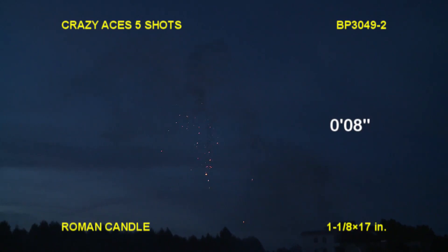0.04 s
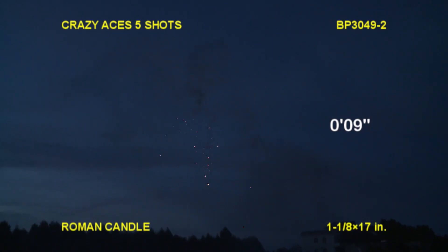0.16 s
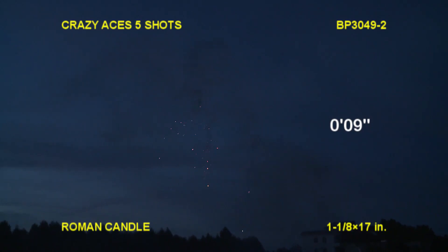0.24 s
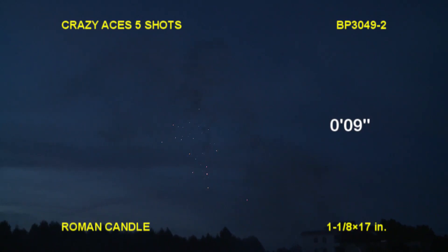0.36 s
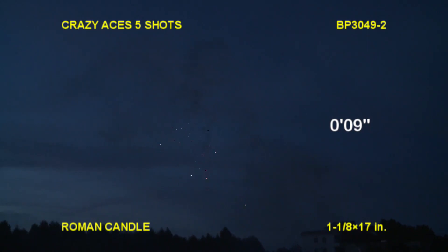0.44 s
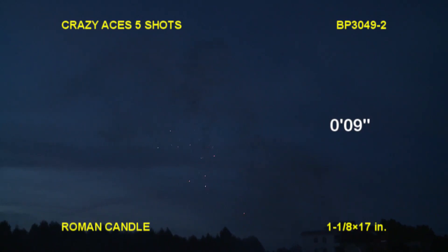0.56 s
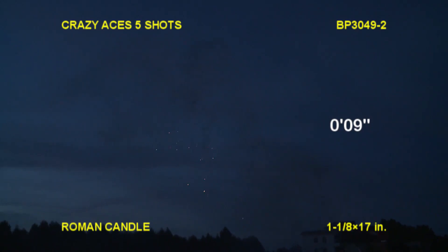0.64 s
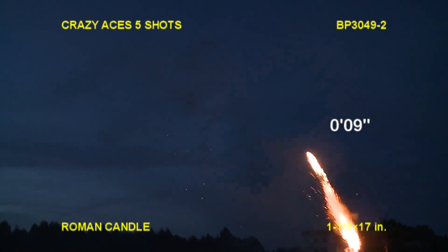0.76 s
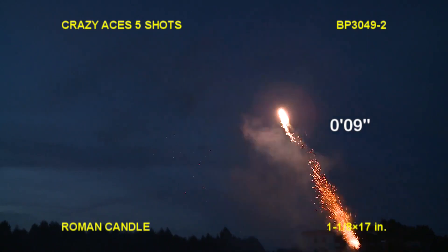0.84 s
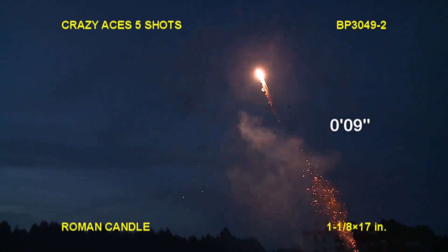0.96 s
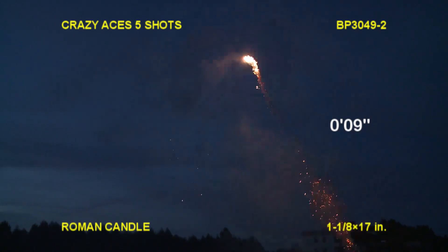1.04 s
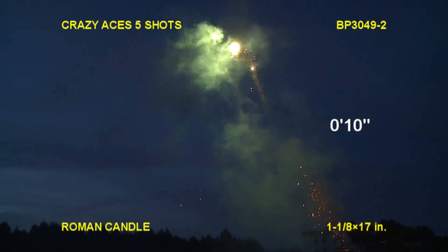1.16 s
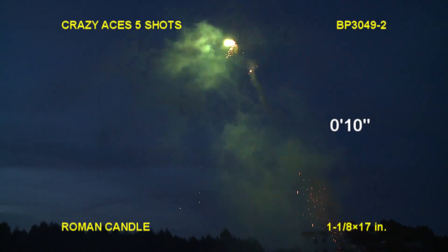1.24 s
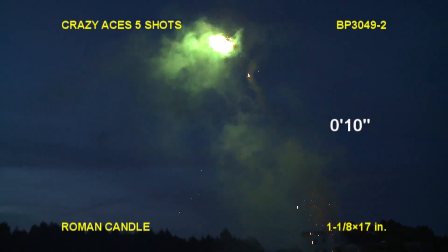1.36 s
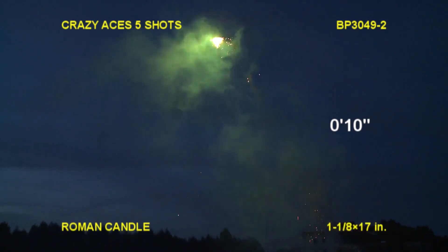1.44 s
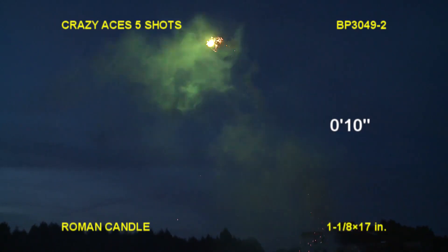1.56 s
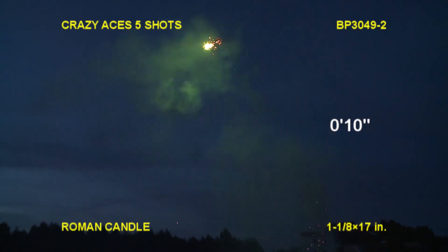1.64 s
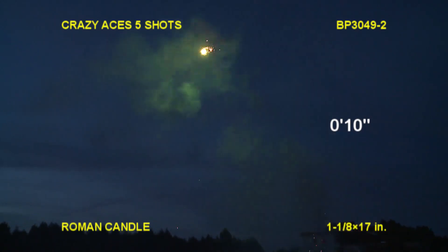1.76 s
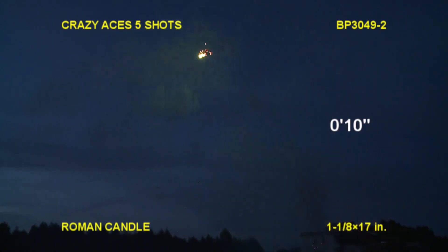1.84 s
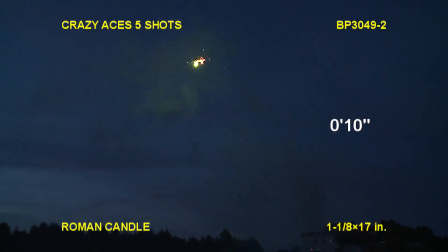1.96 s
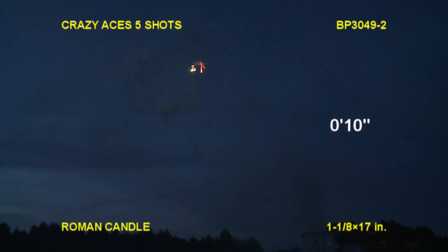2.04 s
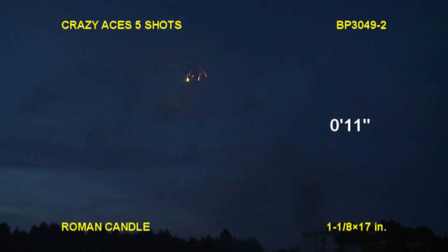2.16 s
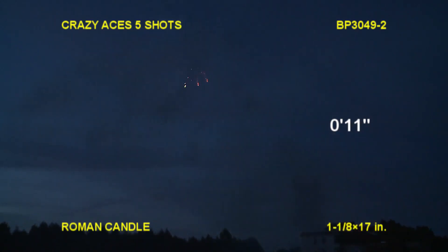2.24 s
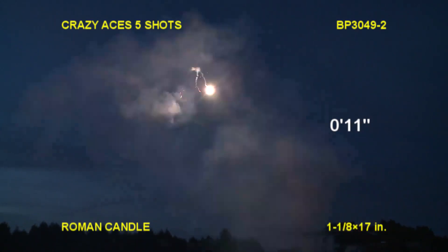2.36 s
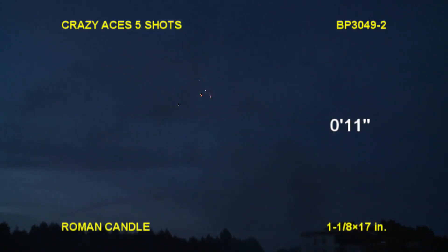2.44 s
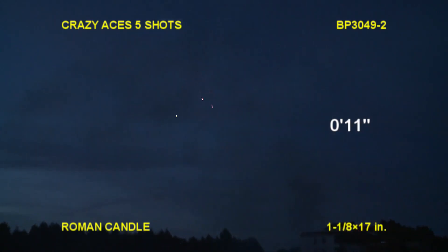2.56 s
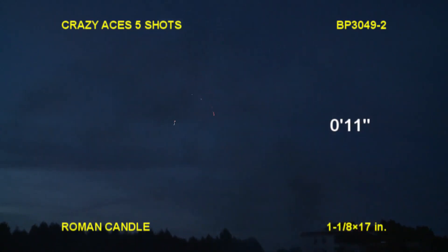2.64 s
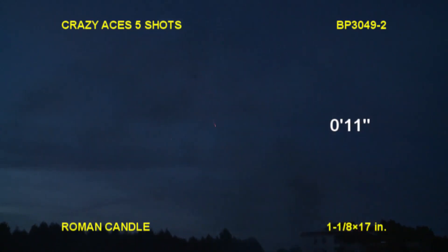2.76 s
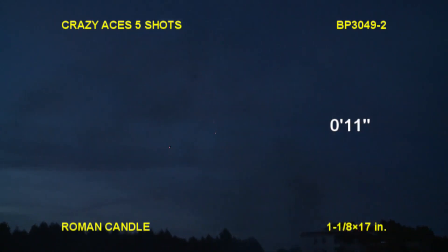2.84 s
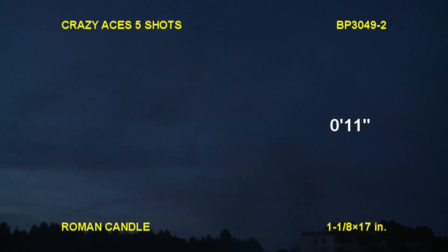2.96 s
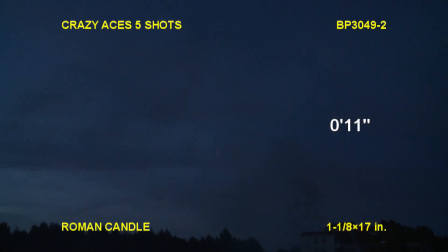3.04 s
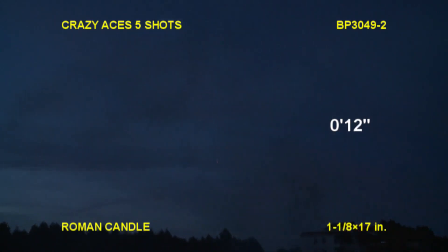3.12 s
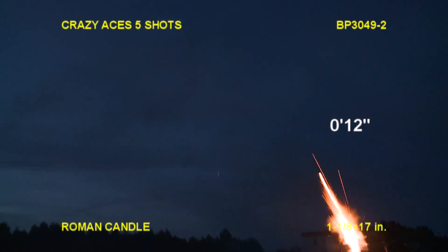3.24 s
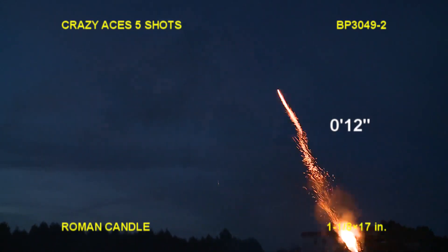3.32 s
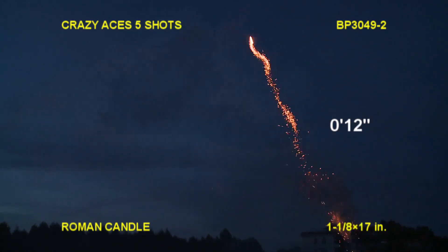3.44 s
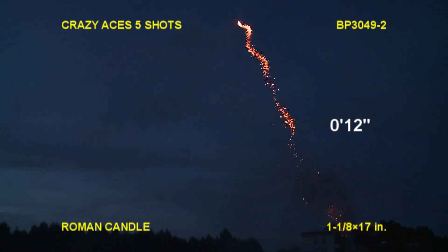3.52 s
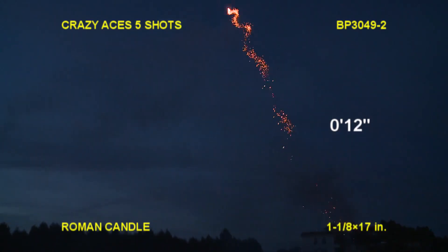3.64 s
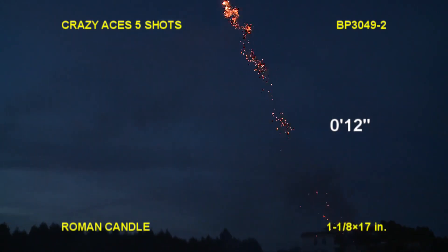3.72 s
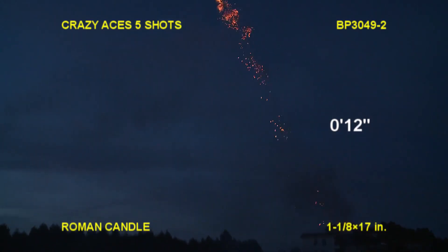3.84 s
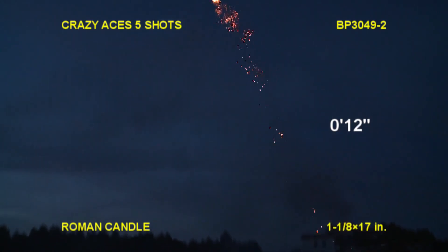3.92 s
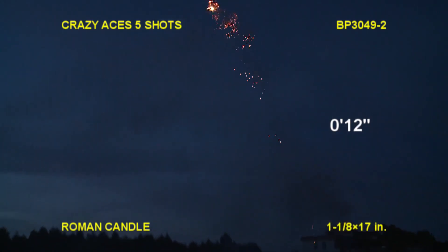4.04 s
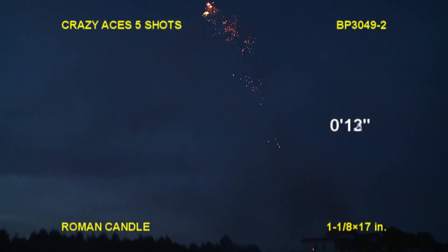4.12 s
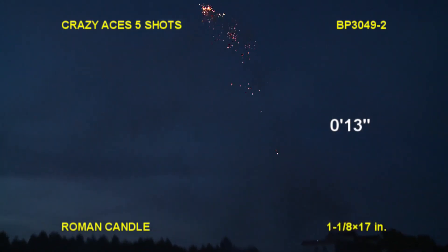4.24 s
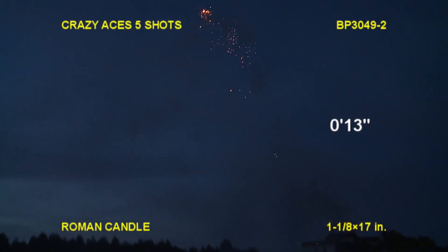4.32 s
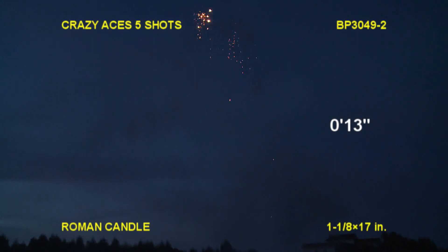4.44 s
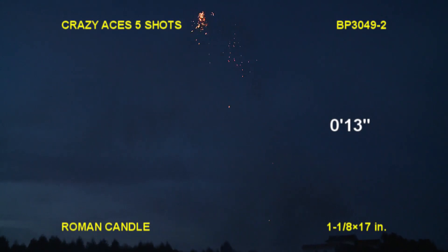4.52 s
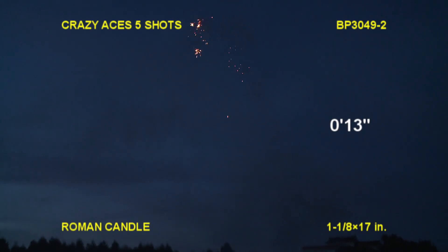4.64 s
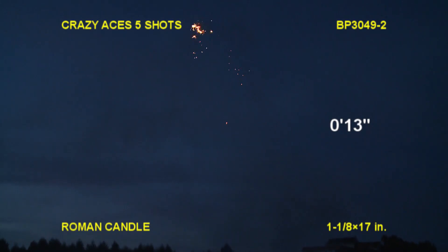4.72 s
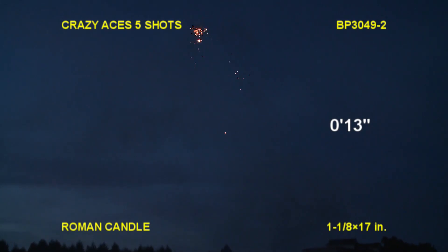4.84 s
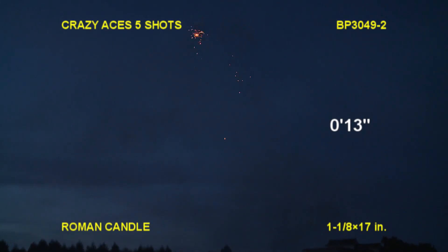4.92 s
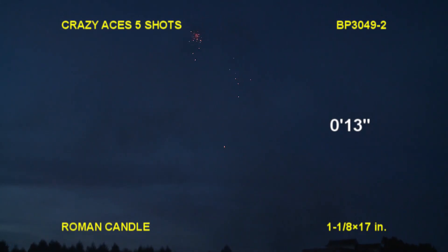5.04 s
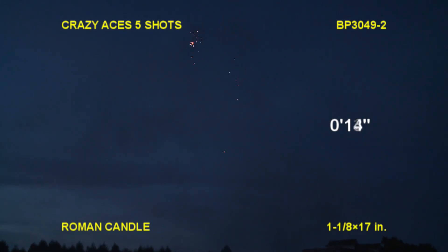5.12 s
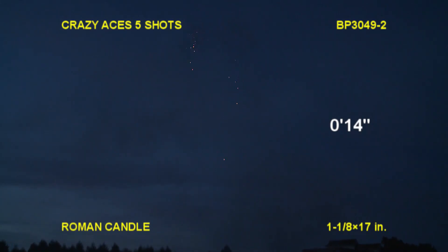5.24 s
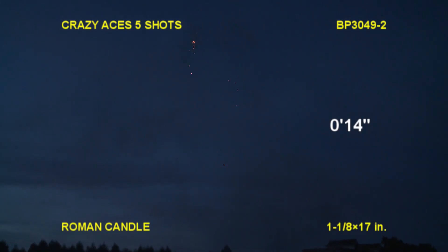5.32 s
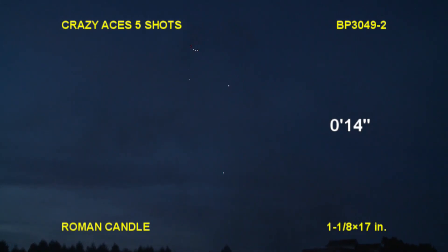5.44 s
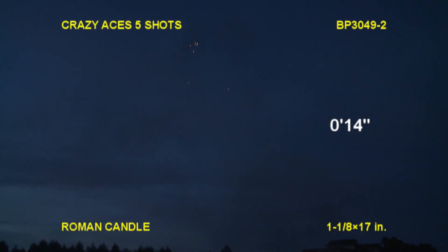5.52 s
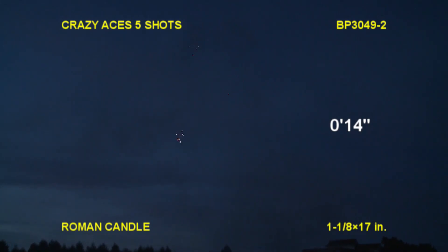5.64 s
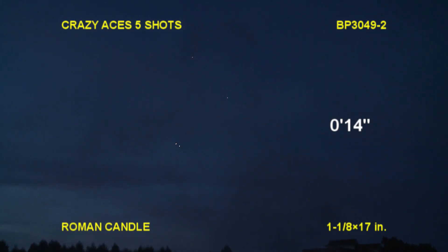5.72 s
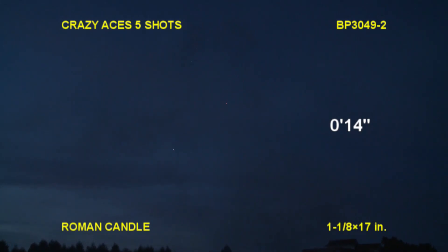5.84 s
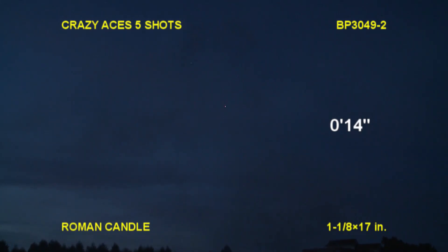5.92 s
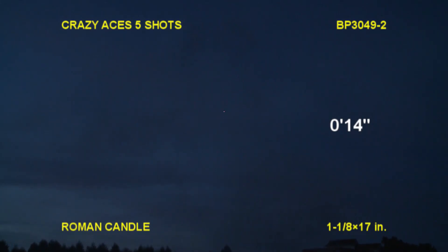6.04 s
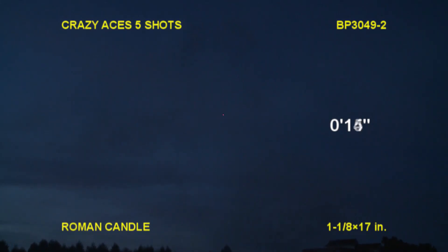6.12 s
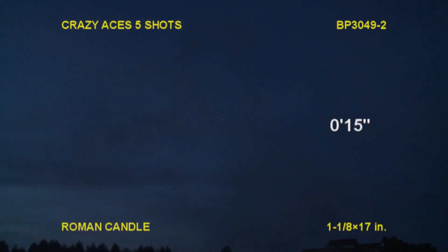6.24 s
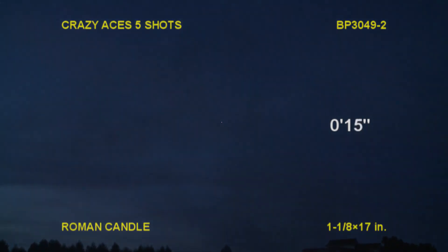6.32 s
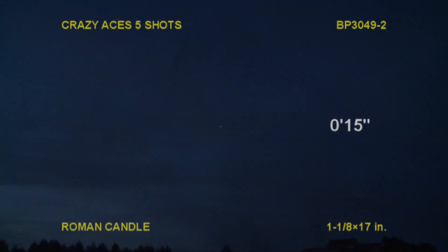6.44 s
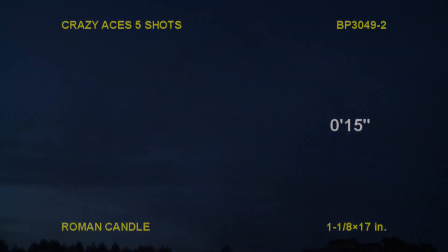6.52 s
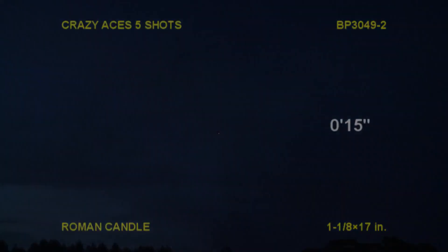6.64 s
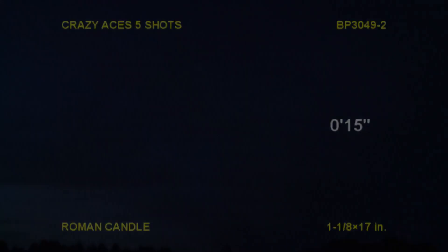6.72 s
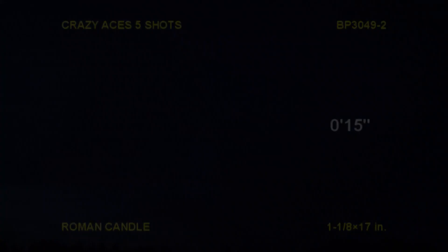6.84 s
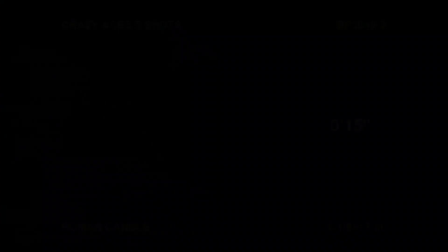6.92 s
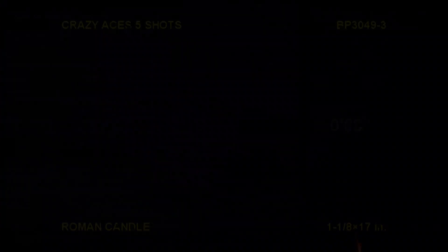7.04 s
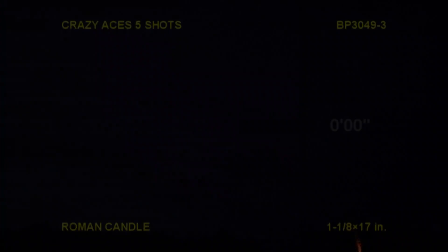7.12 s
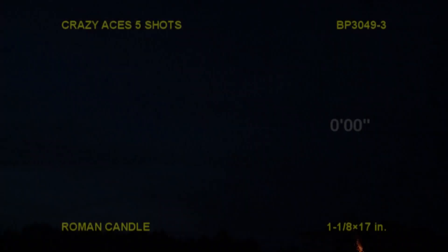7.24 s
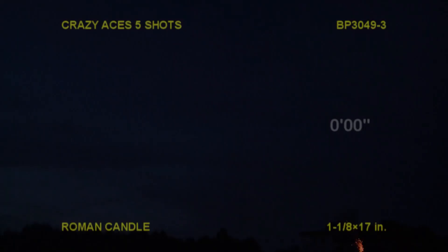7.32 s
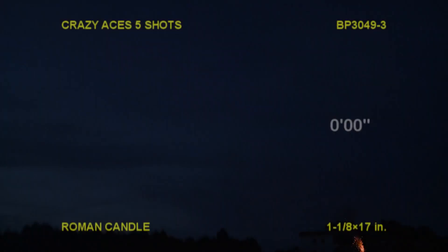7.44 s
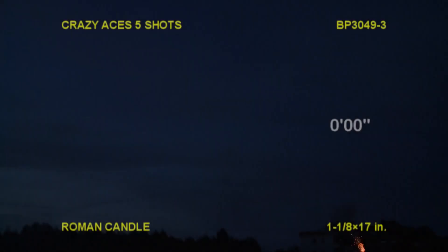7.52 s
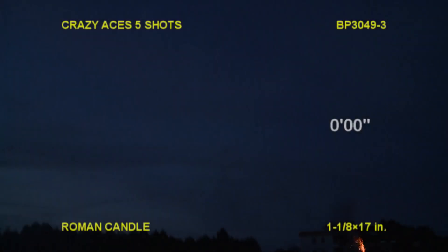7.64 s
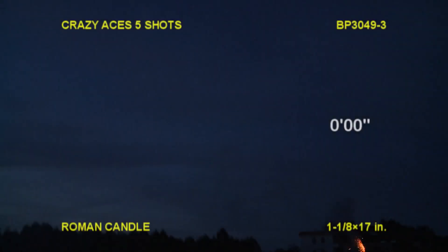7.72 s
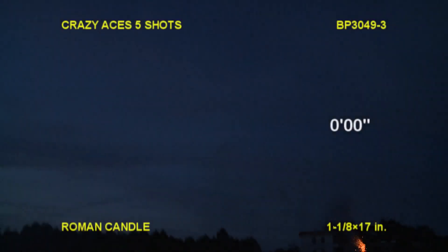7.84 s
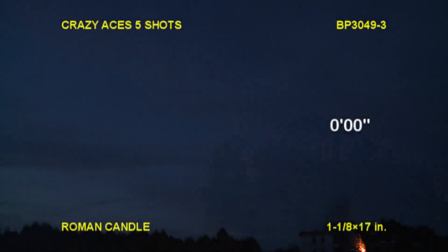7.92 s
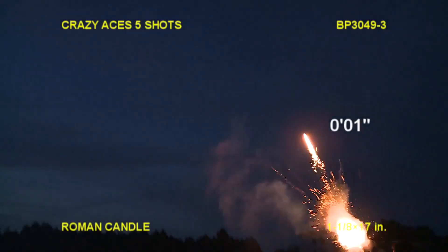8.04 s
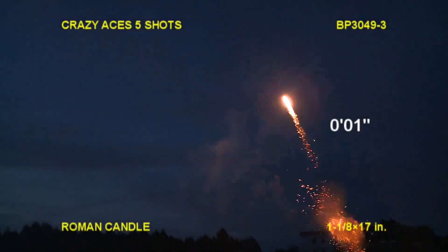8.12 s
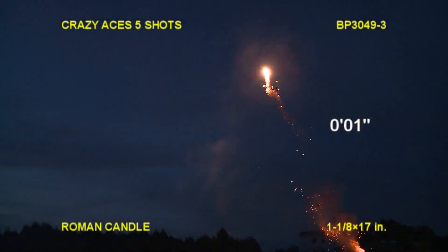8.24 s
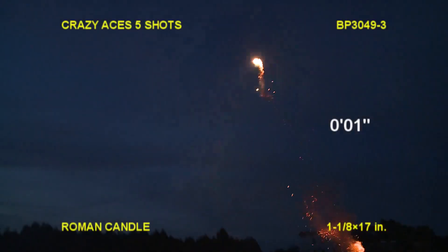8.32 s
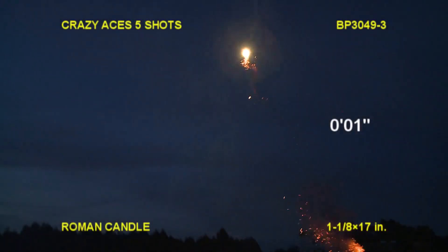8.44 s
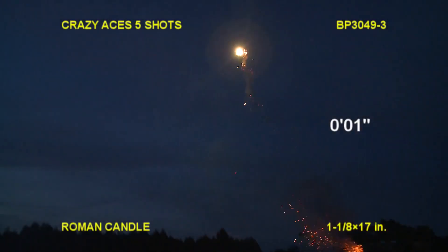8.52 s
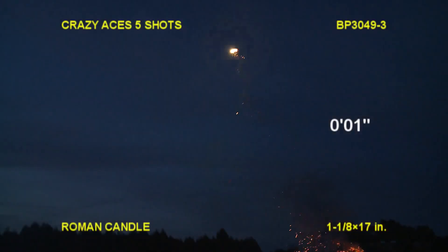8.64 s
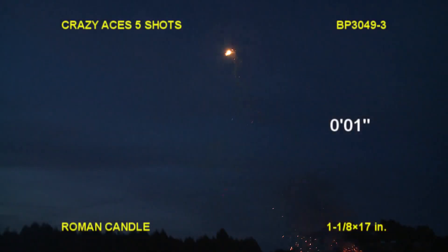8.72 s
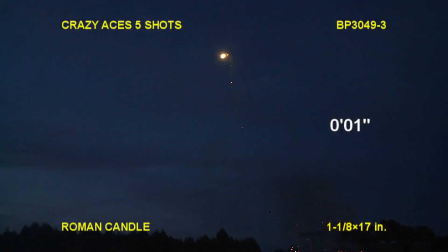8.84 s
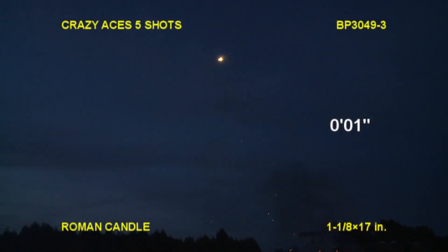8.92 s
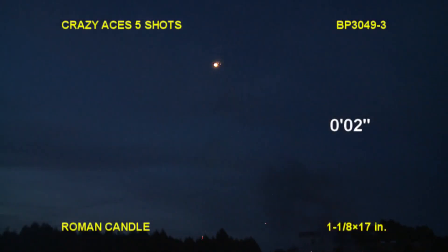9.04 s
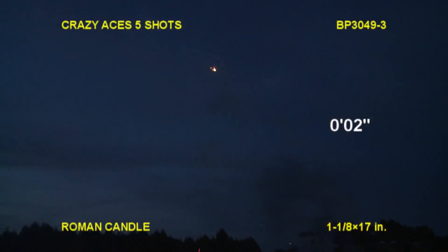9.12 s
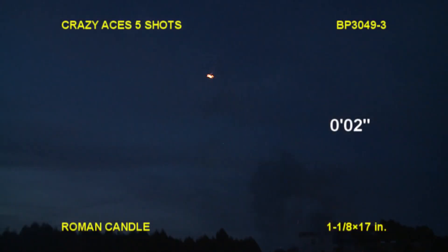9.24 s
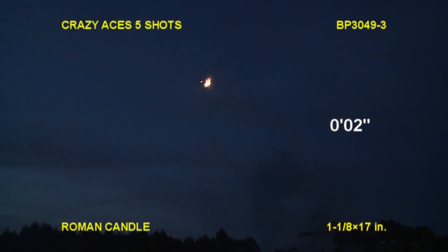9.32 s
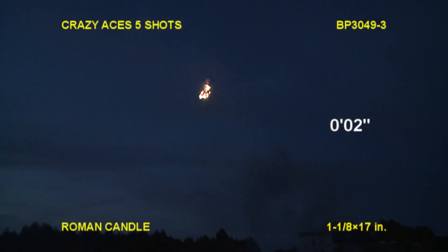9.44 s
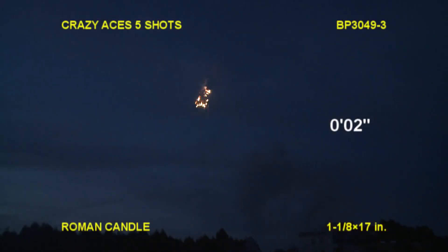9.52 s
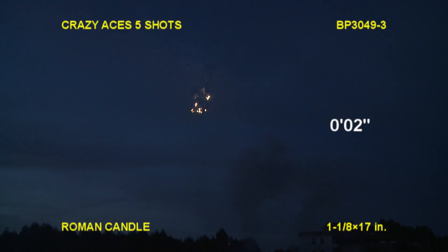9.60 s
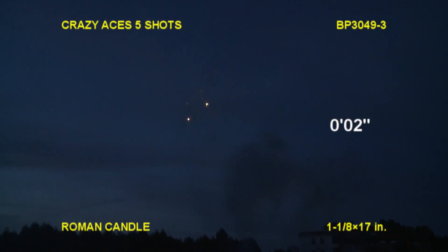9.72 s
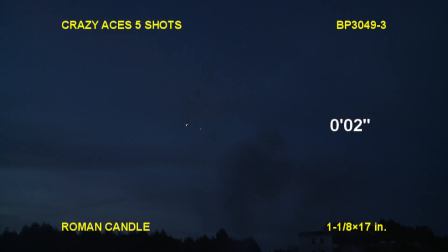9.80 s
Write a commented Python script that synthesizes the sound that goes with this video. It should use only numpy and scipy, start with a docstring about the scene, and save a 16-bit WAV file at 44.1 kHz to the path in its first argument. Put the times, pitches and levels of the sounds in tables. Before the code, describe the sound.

Outdoors at dusk, a firework tube thumps loudly, spitting hissing sparks; a star cracks overhead and echoes off houses and trees. A second thump and crack follow, then a piercing whistle sinks for over a second. Faint pops fade almost to silence before another launch and a tight cluster of bangs. Two nearby microphones overload on the loudest hits.

```python
"""Roman candles at dusk

Two microphones a few metres apart: lift charges thump nearby, stars burst overhead, houses and trees answer.
Bangs are pressure pulses and gas noise sent along many paths, the loudest overloading the inputs.
A whistling star is wavering sines sinking in pitch; sparks, pops and squeaks are short shaped noise bursts.
Air and whistles dip nearly to silence around 7 s; a low humming drone and the tube's hiss sound only after."""
import sys
import numpy as np
from scipy import signal
from scipy.fft import rfft, irfft, next_fast_len
from scipy.io import wavfile
from scipy.ndimage import map_coordinates

SR = 44100
rng = np.random.default_rng(int(sys.argv[2]) if len(sys.argv) > 2 else 0)


def master_out(mix):
    """Clip the mix to full scale and print it as 16-bit PCM to the path in sys.argv[1]."""
    frames = np.transpose(np.atleast_2d(mix))
    ceiling = np.clip(frames, -1, 1)
    pcm = np.round(ceiling * 32767).astype(np.int16)
    wavfile.write(sys.argv[1], SR, pcm)


N = 435266  # length in samples
# every level_db below is relative: mixing gains are added to it


def amp(db):
    """Decibels to gain."""
    return 10 ** (np.asarray(db) / 20)


def unit(x):
    """Scale to rms 1."""
    return x / np.sqrt(np.mean(x ** 2) + 1e-20)


def along(points, hz):
    """Read (Hz, value) points on a log frequency axis."""
    f, v = np.transpose(points)
    return np.interp(np.log(hz + 1), np.log(f + 1), v)


def wobble(rate, count=N):
    """A smooth random curve, rate knots a second."""
    knots = rng.standard_normal(int(count * rate / SR) + 4)
    return map_coordinates(knots, [np.arange(count) * rate / SR])


def filtered(x, response):
    """Multiply the spectrum of x by a complex response of frequency."""
    n = x.shape[-1]
    m = next_fast_len(n + SR // 5)
    return irfft(rfft(x, m) * response(np.fft.rfftfreq(m, 1 / SR)), m)[..., :n]


def coloured(x, points, size=2048):
    """Pass x through a causal minimum-phase filter with the given (Hz, dB) colour."""
    cepstrum = irfft(np.log(amp(along(points, np.fft.rfftfreq(size, 1 / SR)))))
    # folding the cepstrum forward makes the filter causal
    cepstrum[1:size // 2] *= 2
    cepstrum[size // 2 + 1:] = 0
    impulse = irfft(np.exp(rfft(cepstrum)))
    return signal.oaconvolve(x, impulse)[:len(x)]


def noise(points):
    """Steady noise of rms 1 with the given (Hz, dB) colour."""
    size = next_fast_len(N, real=True)
    hz = np.fft.rfftfreq(size, 1 / SR)
    spectrum = amp(along(points, hz)) * np.exp(2j * np.pi * rng.random(len(hz)))
    return unit(irfft(spectrum, size)[:N])


def puff(t60, count=8192):
    """A burst of white noise that falls 60 dB in t60 seconds."""
    return rng.standard_normal(count) * amp(-60 * np.arange(count) / SR / t60)


def panned(lr_db):
    """Left and right gains for a level difference."""
    return amp([[lr_db / 2], [-lr_db / 2]])


def add(track, s, x):
    """Mix x into track from time s on."""
    part = track[max(round(s * SR), 0):][:len(x)]
    part += x[:len(part)]


def swells(rows):
    """Gain of bell-shaped swells (s, dB, half length s), each down to 1/e at its half length."""
    t = np.arange(N) / SR
    return sum(amp(db) * np.exp(-np.minimum(((t - s) / half) ** 2, 20)) for s, db, half in rows)


def ramp(t, s, length):
    """Rise from 0 to 1 over the given length, centred on time s."""
    return np.clip((t - s) / length + .5, 0, 1)


def strewn(span, typical, spread_db, count):
    """Event rows at random times in a span, their levels spread about a typical row."""
    (start, end), (db, *rest) = span, typical
    return [(start + when * (end - start), db + spread_db * (2 * size - 1), *rest)
            for when, size in rng.random((count, 2))]


# how long the open field rings before any stretch: pitch_hz, t60_s
FIELD_DECAY = [(100, 6), (500, 3), (1500, 2.5), (3500, 2), (7000, 2), (14000, 0.53)]
# the colour of its answer: pitch_hz, level_db
FIELD_COLOUR = [(50, -10.5), (300, -18.5), (1200, -4.5), (2300, 0), (4000, -0.5), (6000, 3.5),
                (15000, -0.5)]


def field(build, stretch=1):
    """Stereo echo of trees and houses, left energy 1: it builds up, then the treble dies first."""
    hz, t, z = signal.stft(rng.standard_normal((2, 2 * SR)), SR, nperseg=256)
    t60 = stretch * along(FIELD_DECAY, hz)[:, None]
    decay = amp(along(FIELD_COLOUR, hz)[:, None] - 60 * t / t60)
    tail = signal.istft(z * decay * (1 - np.exp(-t / build)), SR, nperseg=256)[1]
    return tail / np.linalg.norm(tail[0])


# evening air at the left and right microphones: pitch_hz, level_db
AIR_LEFT = [(15, -2.5), (50, -0.5), (110, -8.5), (200, -3), (300, -4.5), (500, -7.5), (1000, -17),
            (2000, -26.5), (4000, -28.5), (8000, -34), (15000, -38.5)]
AIR_RIGHT = [(15, 4), (50, 2.5), (85, -3.5), (130, -14), (220, -19), (350, -23), (1000, -27.5),
             (3500, -38.5), (6000, -43.5), (15000, -55)]
# a faint far hum: its colour (pitch_hz, level_db) and its swell (centre_s, level_db, half_length_s)
FAR_HUM, FAR_HUM_SWELL = [(150, -60.5), (188, -12), (201, 3), (215, -11), (260, -65)], [(5.7, -68, .9)]
# low drone, mostly at the right microphone: pitch_hz, level_db
DRONE_LINES = [(53.5, -0.5), (104, -23)]
# its swells: centre_s, level_db, half_length_s
DRONE_SWELLS = [(7.74, -34.5, 0.6), (8.83, -33.5, 0.3), (9.86, -35.5, 0.21)]
# steady hum above the drone: pitch_hz, level_db
HUM = [(102.3, -56.5), (242.2, -67), (425.3, -63.5), (538.3, -60), (829.0, -65.5)]
# hiss of the burning tube: pitch_hz, level_db
FUSE = [(100, 0), (200, -2.5), (350, -10), (540, -10), (800, -12.5), (1600, -14.5), (2600, -19.5),
        (3800, -24.5), (5500, -36), (8000, -55.5), (15000, -63.5)]
FUSE_GROWS_DB_PER_S = 0.28  # it grows as the tube burns down
SILENT_S, FADE_OUT_S, FADE_IN_S = 7.05, 0.47, 0.41  # centre and sides of the dip in the steady sounds


def background(left_db, right_db, drone_db, fuse_db, hum_db):
    """Noise for evening air; after the dip also a drone of wandering sines and the tube's hiss."""
    since = np.arange(N) / SR - SILENT_S
    right_level = right_db + 0.72 * wobble(7.9)
    air = np.array([amp(left_db) * noise(AIR_LEFT), amp(right_level) * noise(AIR_RIGHT)])
    air += swells(FAR_HUM_SWELL) * noise(FAR_HUM) * panned(-6.5)
    # all lines drift in pitch together
    clock = np.cumsum(1 + 0.0076 * wobble(1.1)) / SR

    def lines(rows):
        return sum(amp(db) * np.sin(2 * np.pi * hz * clock) for hz, db in rows)

    drone = unit(lines(DRONE_LINES)) * amp(drone_db) * swells(DRONE_SWELLS)
    drone = (drone + amp(hum_db) * lines(HUM)) * amp([[-26], [0]])
    fuse_level = fuse_db + FUSE_GROWS_DB_PER_S * since + 2.4 * wobble(4)
    fuse = np.array([noise(FUSE), noise(FUSE)]) * amp(fuse_level) * panned(-10.5)
    return air + (fuse + drone) * (since > 0)


def fade():
    """Gain that falls to a thirtieth or so and comes back."""
    t = np.arange(N) / SR - SILENT_S
    return np.clip(np.maximum(-t / FADE_OUT_S, t / FADE_IN_S), .03, 1)


# an earlier whistle lingering in the field: pitch_hz, level_db
OLD_WHISTLE = [(1650, -44), (2800, -30), (3000, -26.5), (3160, -23.5), (3250, -7), (3350, 7), (3870, 5),
               (4150, 2), (4420, -24), (4800, -20.5), (6240, -54.5), (10600, -120)]


def old_whistle(db, t60, lr_db):
    """The echo of an earlier whistle, narrow noise that dies away."""
    decay = amp(db - 60 * np.arange(N) / SR / t60)
    return np.array([noise(OLD_WHISTLE), noise(OLD_WHISTLE)]) * decay * panned(lr_db)


# flurries of fine crackle from the sparks' trails: centre_s, level_db, half_length_s
FLURRIES = [(.08, -59, 0.11), (.35, -59.5, 0.095), (1.6, -75.5, 0.99), (2.75, -55, 0.15), (4.3, -55, 0.77),
            (7.8, -72.5, .35), (9.42, -57.5, 0.029), (9.8, -40, .15)]
# loudest spark snaps: start_s, level_db, body_db, left_minus_right_db
SPARKS = [(0.436, -35.5, -24, -1), (1.1278, -59.5, 2.5, -19), (1.3794, -44.5, -13, -16),
          (1.797, -38.5, -16.5, -7), (4.7367, -51.5, 0.5, -20), (4.7793, -33, -12, -13),
          (5.2607, -38, -12, -9), (5.7281, -48, -16, -13), (6.9525, -53.5, -11, 17),
          (8.4449, -59, 18, -3.5)]
# colour of a snap: pitch_hz, level_db
SNAP = [(800, -21.5), (2000, -2), (4000, 3), (6000, -7), (10000, -5), (15000, -6)]
# fainter snaps at random while embers fall: from and to in s; typical level_db, body_db, left_minus_right_db
EMBER_SPAN, EMBER = (0, 4.1), (-57, -10, -16)


def sparks(snap_db, body_db, snap_t60, trail_db, grain_t60, grain_spread_db):
    """Single sparks snap, each a sharp and a longer noise burst, over a fine random crackle."""
    out = np.zeros((2, N))
    snaps = SPARKS + strewn(EMBER_SPAN, EMBER, spread_db=3.5, count=12)
    trail = amp(trail_db) * swells(FLURRIES)
    decay = amp(-60 * np.arange(SR // 20) / SR / grain_t60)
    for mic in range(2):
        for s, db, rel_db, lr_db in snaps:
            snap = amp(snap_db) * coloured(puff(snap_t60), SNAP)
            body = coloured(puff(0.084), [(300, -23), (1000, 0.0), (2000, 4.0), (5000, -8.5), (15000, -31)])
            add(out[mic], s, amp(db) * panned(lr_db)[mic] * (snap + amp(body_db + rel_db) * body))
        # every grain is its own tiny burst of noise
        size_db = grain_spread_db * np.minimum(rng.exponential(size=3000), 4)
        power = np.bincount(rng.integers(N, size=3000), amp(size_db) ** 2, N)
        envelope = np.sqrt(np.abs(signal.oaconvolve(power, decay ** 2)[:N]))
        grains = envelope * rng.standard_normal(N)
        crackle = unit(coloured(grains, [(500, -16.5), (2000, 6), (4000, 1.0), (8000, -8), (15000, -7.5)]))
        out[mic] += crackle * trail * panned(-18.5)[mic]
    return out


# loudest dull, distant pops: start_s, level_db, left_minus_right_db
POPS = [(0.383, -44, -2.5), (4.743, -36.5, -14), (5.068, -32, -9), (5.233, -39.5, -3), (5.352, -44, -12),
        (6.118, -34.5, -5.5), (6.245, -38.5, -11.5), (6.438, -35, 3)]
# their colour: pitch_hz, level_db
POP = [(80, -36.5), (200, -8.5), (600, 4), (1050, 5.5), (1700, -31), (4000, -29.5), (12000, -34)]
# a volley of fainter ones: two ends of its span in s; typical level_db, left_minus_right_db
VOLLEY_SPAN, VOLLEY_POP = (5.1, 3.8), (-43, 2)


def pops(level_db, t60, rise):
    """Far reports that have lost their treble and their sharp front."""
    out = np.zeros((2, N))
    for s, db, lr_db in POPS + strewn(VOLLEY_SPAN, VOLLEY_POP, spread_db=7, count=4):
        for mic in range(2):
            report = coloured(puff(t60), POP)
            report *= 1 - np.exp(-np.arange(len(report)) / SR / rise)
            add(out[mic], s, amp(db + level_db) * panned(lr_db)[mic] * report)
    return out


def echoes(walls, scatter_db):
    """Every wall gives one path to each microphone."""
    paths = []
    for left_s, left_db, right_s, right_db in walls:
        paths += [(0, left_s, left_db, scatter_db), (1, right_s, right_db, scatter_db)]
    return paths


# slow pressure push of a bang: pitch_hz, level_db
BOOM = [(30, -3), (90, -5.5), (200, -2), (400, -3.5), (900, -29.5), (4000, -58.5)]
# ring of the right microphone's housing: pitch_hz, width_hz, level_db
HOUSING = (2226, 470, 2.7)


def pressure_front(t, width_ms, swing_db, lowcut_hz, boom_db):
    """A blast pulse crossing zero at its width, a damped swing and a slow push."""
    u = t * 1000 / width_ms
    front = -1.33 * (1 - np.exp(-u / 0.29)) * (1 - u) * np.exp(-u * u / 3.65)
    # the gas overshoots and swings back a few times
    front -= amp(swing_db) * np.sin(2 * np.pi * u / 4.2) * np.exp(-u / 6)
    # the deepest part is lost, and a slow push follows
    front = signal.lfilter(*signal.butter(1, lowcut_hz, "high", fs=SR), front)
    return front + amp(boom_db) * coloured((t == 0) * 1., BOOM)


def near_air(paths, scatter_t60, scatter_hz, near_db, near_t60):
    """Impulse responses of the near paths to both microphones, with a dense noise tail."""
    air = np.zeros((2, SR // 2))
    for mic, delay, path_db, scatter_db in paths:
        # rough walls smear each reflection, the far ones longest; long waves pass unscattered
        smear = puff(scatter_t60 + 0.34 * delay)
        norm = np.linalg.norm(smear)
        smear = signal.lfilter(*signal.butter(1, scatter_hz, "high", fs=SR), smear) * amp(scatter_db) / norm
        smear[0] += 1
        add(air[round(mic)], delay, amp(path_db) * smear)
    # sharp fronts ring the right microphone's housing
    ring_hz, width_hz, ring_db = HOUSING
    air[1] = filtered(air[1], lambda f: 1 + amp(ring_db) * 1j * f * width_hz
                      / (ring_hz ** 2 - f * f + 1j * f * width_hz))
    for mic in range(2):
        near = puff(near_t60)
        add(air[mic], 0, amp(near_db) * near / np.linalg.norm(near))
    return air


def bangs(shots, paths, rush_t60, scatter_t60, near_db, near_t60, field_db, right_field_db,
          lead_db, boom_db, edge_db, lowcut_hz, swing_db, scatter_hz):
    """Each charge sends a pressure pulse and a rush of gas along every path to both microphones."""
    out, t = np.zeros((2, N)), np.arange(SR // 20) / SR
    kick = (t == 0) * 1.
    rush_colour = [(100, 4.0), (500, 12.5), (1500, 14.0), (4000, 1.5), (15000, -25.0)]
    for s, db, width_ms, rush_db, lag_ms in shots:
        front = pressure_front(t, width_ms, swing_db, lowcut_hz, boom_db)
        pulse = front + amp(rush_db) * coloured(puff(rush_t60, count=len(t)), rush_colour)
        # the far field blurs the rush into a smooth roar
        source = front - amp(rush_db + edge_db) * kick
        roar = signal.fftconvolve(source[None], field(build=0.14), axes=1)
        roar *= amp([[field_db], [right_field_db]])
        air = near_air(paths, scatter_t60, scatter_hz, near_db, near_t60)
        for mic in range(2):
            arrival = s + mic * lag_ms / 1000
            add(out[mic], arrival, amp(db) * signal.fftconvolve(pulse, air[mic]))
            add(out[mic], arrival, amp(db) * roar[mic])
            # a few milliseconds of rising hiss just before each bang
            lead = puff(0.0082, count=320)[::-1]
            add(out[mic], arrival - len(lead) / SR, amp(db + rush_db + lead_db) * lead)
    return out


# lift charges, timed at the left microphone: start_s, level_db, width_ms, gas_rush_db
LAUNCHES = [(0.7598, 9.5, 0.76, -26), (3.2939, 13.5, 0.79, -13.5), (8.0032, 14.5, 0.75, -13.5)]
# direct sound and close bounces from the tube: microphone (0 left, 1 right), delay_s, level_db, scatter_db
GROUND_NEAR = [(0, 0.0013, -2.5, -21), (1, 0.00044, -3, -10.5), (1, 0.0017, -4, -8)]
# houses that echo the tube: left_delay_s, left_db, right_delay_s, right_db
GROUND_WALLS = [(.029, -28, .043, -20), (.105, -40, .089, -32.5), (.161, -27, .146, -26.5),
                (.2, -29.5, .185, -26.5), (.248, -38.5, .242, -32)]
TUBE_LAG_MS = 5.35  # the tube is nearer the left microphone, so the right one hears it later


def launches():
    """Lift charges thump from the tube on the ground."""
    return bangs([(*shot, TUBE_LAG_MS) for shot in LAUNCHES],
                 GROUND_NEAR + echoes(GROUND_WALLS, scatter_db=-1.5),
                 rush_t60=0.011, scatter_t60=0.036, near_db=-10.0, near_t60=0.22,
                 field_db=-25.0, right_field_db=-21, lead_db=-14.0, boom_db=3, edge_db=2.5,
                 lowcut_hz=210, swing_db=-15, scatter_hz=400)


# hiss of the sparks thrown from the tube: pitch_hz, level_db
SPRAY = [(500, -7.5), (2000, -3.5), (4000, 4.5), (6500, -10), (10500, -6.5), (15000, -9.5)]


def spray(level_db, t60):
    """Every launch throws a hissing fan of sparks, a second of dying noise."""
    out = np.zeros((2, N))
    for s, db, width_ms, rush_db in LAUNCHES:
        for mic in range(2):
            hiss = coloured(puff(t60, count=SR), SPRAY)
            add(out[mic], s, amp(db + rush_db + level_db) * hiss)
    return out * panned(-12.5)


# short squeaks of a dying star: start_s, level_db
SQUEAKS = [(1.629, -32.5), (1.6652, -37.5), (1.67, -33.5)]
# their colour: pitch_hz, level_db
SQUEAK = [(1000, -25), (2500, -13), (3300, -9.5), (3900, 0), (4600, -10), (5500, -18.5), (9000, -25.5),
          (15000, -11.5)]


def squeaks(level_db, t60):
    """Whistle mixture catches for an instant, a noise burst around one pitch."""
    out = np.zeros((2, N))
    for s, db in SQUEAKS:
        for mic in range(2):
            add(out[mic], s, amp(db + level_db) * coloured(puff(t60), SQUEAK))
    return out * panned(-11)


# soft rustling swells in the distance: centre_s, level_db, half_length_s
RUSTLES = [(1.983, -53.5, 0.023), (6.098, -54.5, 0.028), (6.255, -59, .025), (6.43, -55, 0.0192),
           (6.697, -62, 0.058)]
# their colour: pitch_hz, level_db
RUSTLE = [(100, -7.5), (500, 5), (1000, -2.5), (1700, -3.5), (3500, -8), (6000, -28), (15000, -32)]


def rustles(level_db):
    """Coloured noise briefly swells and sinks."""
    return amp(level_db) * swells(RUSTLES) * np.array([noise(RUSTLE), noise(RUSTLE)])


# stars bursting overhead: start_s, level_db, width_ms, gas_rush_db, right_lag_ms
BURSTS = [(2.5085, 13.5, 0.3, -13, 8.64), (3.5546, 12.5, 0.22, -19, 8.96), (5.0478, -18, .12, -4, 1.18),
          (9.5265, 3, 0.58, -64, 8.8), (9.6858, 7, 0.25, -9.5, 9.2), (9.6918, 3, 0.2, -9, 9.2),
          (9.8204, 8, 0.11, -16.5, 9.6)]
# direct sound and close bounces from the sky: microphone (0 left, 1 right), delay_s, level_db, scatter_db
SKY_NEAR = [(0, 0.00076, 0.5, -24), (1, 0, 1, -6.5), (1, .0035, -2, -6), (1, .0161, -6, -10.5)]
# houses that echo the sky: left_delay_s, left_db, right_delay_s, right_db
SKY_WALLS = [(.01, -30.5, .048, -27), (.148, -19.5, .131, -17), (.191, -17.5, .172, -14),
             (.22, -25, .24, -22.5)]


def bursts():
    """Stars burst overhead, sharper than the launches and with more answer from the field."""
    return bangs(BURSTS, SKY_NEAR + echoes(SKY_WALLS, scatter_db=-1),
                 rush_t60=0.0053, scatter_t60=0.022, near_db=-14, near_t60=0.46,
                 field_db=-15.0, right_field_db=-11.0, lead_db=-35.5, boom_db=10.5, edge_db=5.0,
                 lowcut_hz=190, swing_db=-33, scatter_hz=205.8)


# the flame lights, catches fully, weakens steadily and burns out with a last gasp
LIGHT_S, CATCH_S, BURNOUT_S, GASP_S = 3.615, 3.7, 4.978, 5.0
LIT_DB, CAUGHT_DB, GASP_DB = -24, -16, -23.5
SAG_DB_PER_S, FLAME_EDGE_S, GASP_HALF_S = 7, .02, 0.0095


def burn(t):
    """Strength of the whistling flame."""
    lit = amp(LIT_DB) * ramp(t, LIGHT_S, FLAME_EDGE_S)
    caught = amp(CAUGHT_DB - SAG_DB_PER_S * (t - CATCH_S)) * ramp(t, CATCH_S, FLAME_EDGE_S)
    gasp = amp(GASP_DB) * np.exp(-((t - GASP_S) / GASP_HALF_S) ** 2)
    return np.maximum(lit, caught) * (1 - ramp(t, BURNOUT_S, FLAME_EDGE_S)) + gasp


# whistling star, before it wavers: time_s, pitch_hz
WHISTLE = [(3.61, 3810), (3.706, 3716), (3.802, 3650), (3.9, 3620), (4.264, 3293), (4.398, 3230),
           (4.6, 3115), (4.752, 3075), (5.0, 3053)]
# its partials: pitch_multiple, level_db
OVERTONES = [(1, 0.5), (2, -34), (3, -36.5)]
# half-number partials, heard only while the flame beats unevenly: pitch_multiple, level_db
HALVES = [(.5, -18), (1.5, -28.5), (2.5, -40)]
UNEVEN_HOLD_S, UNEVEN_RELEASE_S = .3, .25  # the flame beats unevenly just after it catches
# the star moves, so the trees around hear it higher than the microphones do: pitch_ratio, level_db
DOPPLER = [(1.025, -8.5), (1.06, -8.5), (1.11, -10.5), (1.18, -17)]
# houses that return the whistle as distinct strands: delay_s, level_db
WHISTLE_WALLS = [(.2, -8), (.29, -6.5)]
WALLS_FADE_DB_PER_S = 10  # the star flies away from them


def whistle(level_db, wet_db, lr_db, wet_lr_db, waver, flutter_db, halves_db, far_db, far_s, blur_db):
    """A burning tube sings lower as its cavity grows; the field holds the pitches it has left."""
    t = np.arange(LIGHT_S - FLAME_EDGE_S, GASP_S + 2 * GASP_HALF_S, 1 / SR)

    def drift(rate):
        return wobble(rate, count=len(t))

    pitch = np.interp(t, *np.transpose(WHISTLE))
    phase = 2 * np.pi * np.cumsum(pitch * (1 + waver * drift(45) + 0.0077 * drift(500))) / SR
    strength = burn(t) * amp(level_db + flutter_db * drift(30))
    tone = sum(amp(level) * np.sin(k * phase) for k, level in OVERTONES)
    uneven = ramp(t, CATCH_S + FLAME_EDGE_S, 2 * FLAME_EDGE_S)
    uneven *= 1 - ramp(t, CATCH_S + UNEVEN_HOLD_S, UNEVEN_RELEASE_S)
    tone += uneven * amp(halves_db) * sum(amp(level) * np.sin(k * phase) for k, level in HALVES)
    # the flame sputters, roughening every partial
    tone *= 1 + 0.3 * drift(260)
    # each direction gets its own wandering shift, wider as the star flies on
    speed = .7 + .69 * (t - CATCH_S)
    turns = [(db, 2 * np.pi * np.cumsum(pitch * ratio ** speed + 50 * drift(90)) / SR)
             for ratio, db in DOPPLER]
    shifted = sum(amp(db) * np.sin(turn) for db, turn in turns)
    # the overtones come back blurred in the same way
    shifted += sum(amp(db + level + blur_db) * np.sin(k * turn)
                   for db, turn in turns for k, level in OVERTONES[1:])
    # the near trees answer first, then the houses, and a far tree line much later
    trees, far = field(build=0.06, stretch=1.0), field(build=0.5, stretch=0.42)
    direct = strength * tone
    leaving_db = WALLS_FADE_DB_PER_S * (t - CATCH_S)
    out = np.zeros((2, N))
    for mic in range(2):
        add(trees[mic], far_s, amp(far_db) * far[mic])
        echo = signal.fftconvolve(strength * shifted, trees[mic])
        add(out[mic], t[0], direct * panned(lr_db)[mic])
        for delay, db in WHISTLE_WALLS:
            add(out[mic], t[0] + delay, amp(db - leaving_db) * direct * panned(lr_db)[mic])
        add(out[mic], t[0], amp(wet_db) * echo * panned(wet_lr_db)[mic])
    return out


# the right microphone's brighter colour, heard on the bangs: pitch_hz, level_db
RIGHT_COLOUR = [(30, 7.5), (150, 6.5), (270, 1.5), (500, 2.5), (1100, 2.5), (3500, 11), (6000, -0.5),
                (15000, 10.5)]


def scene():
    """All sources at the two microphones."""
    left, right = launches() + bursts()
    small = sparks(snap_db=-4.5, body_db=12, snap_t60=0.018, trail_db=-0.5, grain_t60=0.037,
                   grain_spread_db=2.5)
    small += pops(level_db=10.0, t60=0.034, rise=0.0031)
    small += squeaks(level_db=5.5, t60=.05) + rustles(level_db=1.5)
    # the field answers the small sounds too
    answer = signal.fftconvolve(small, field(build=.03, stretch=0.34), axes=1)[:, :N]
    small = small + amp(-16.5) * answer
    whistles = whistle(level_db=-3.5, wet_db=-6.5, lr_db=-16.0, wet_lr_db=-14.5, waver=0.0036,
                       flutter_db=2.5, halves_db=-0.5, far_db=-21.5, far_s=0.6, blur_db=3)
    whistles += old_whistle(db=-44.5, t60=2.2, lr_db=-13.0)
    steady = whistles + background(left_db=-61.0, right_db=-46.5, drone_db=6.5, fuse_db=-51, hum_db=3)
    loud = np.array([left, coloured(right, RIGHT_COLOUR)])
    return loud + spray(level_db=-31.0, t60=.6) + small + steady * fade()


TOP_HZ = 15900  # band limit


def record(dry):
    """The inputs clip on loud bangs; a steep filter then removes what lies above the band limit."""
    clipped = np.clip(dry, -.93, .93)
    return filtered(clipped, lambda hz: 1 / (1 + (hz / TOP_HZ) ** 100))


dry = scene()
out = record(dry)
master_out(out)
```